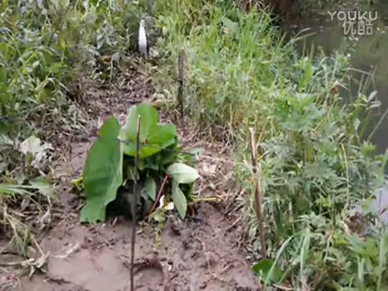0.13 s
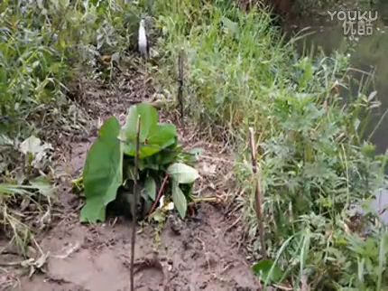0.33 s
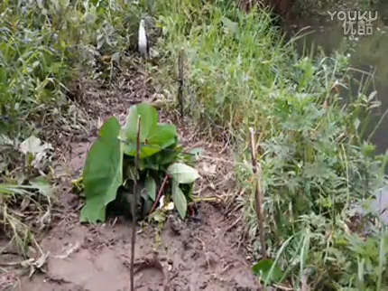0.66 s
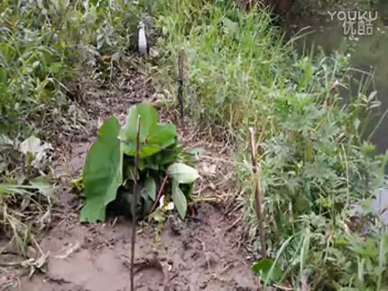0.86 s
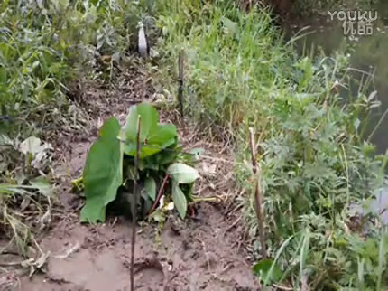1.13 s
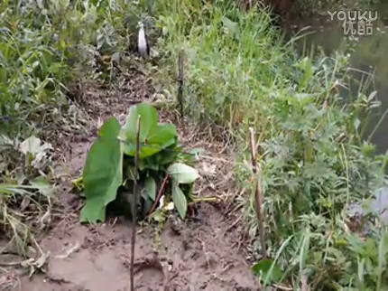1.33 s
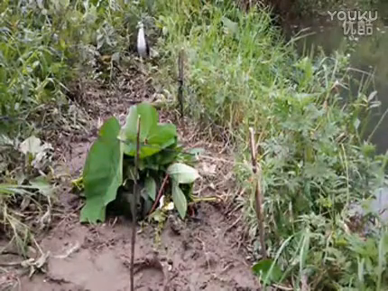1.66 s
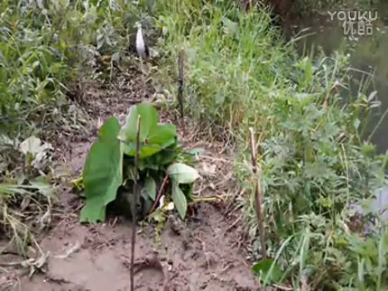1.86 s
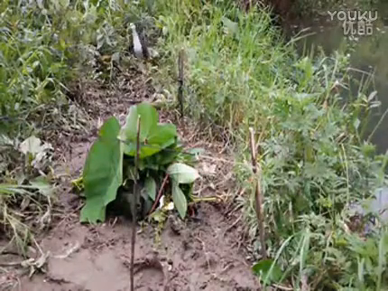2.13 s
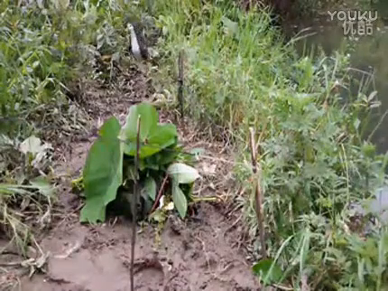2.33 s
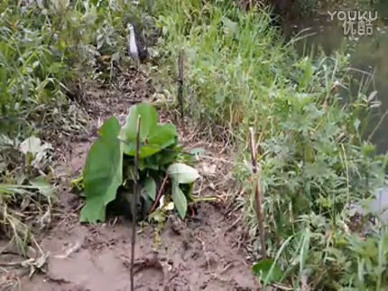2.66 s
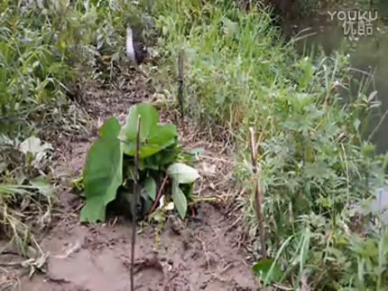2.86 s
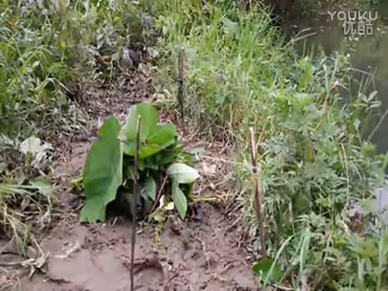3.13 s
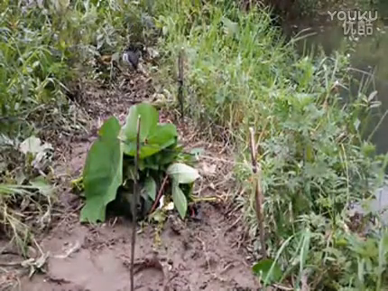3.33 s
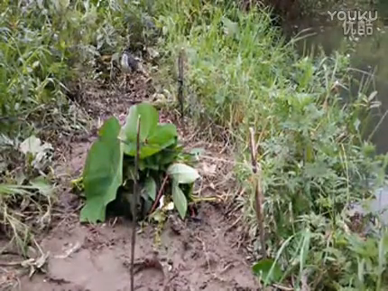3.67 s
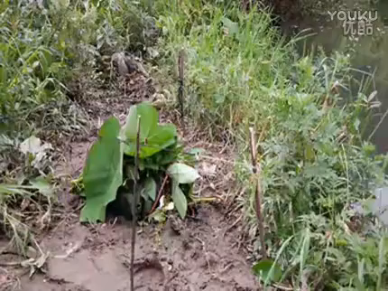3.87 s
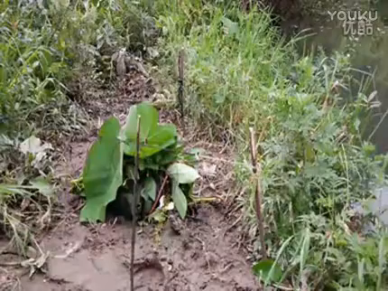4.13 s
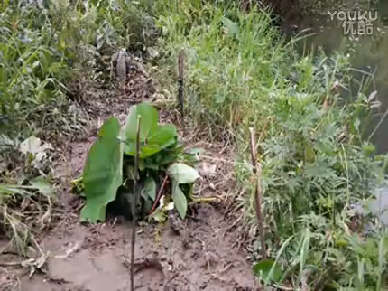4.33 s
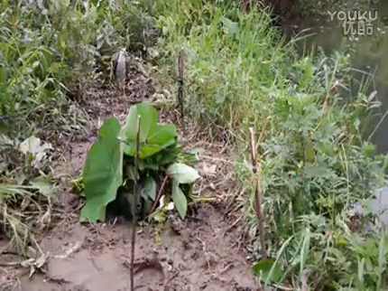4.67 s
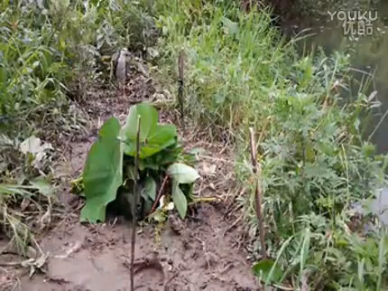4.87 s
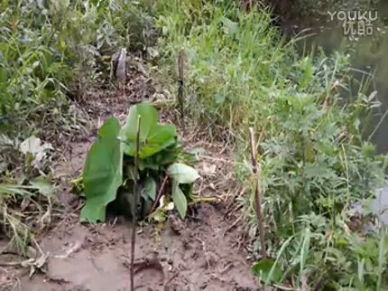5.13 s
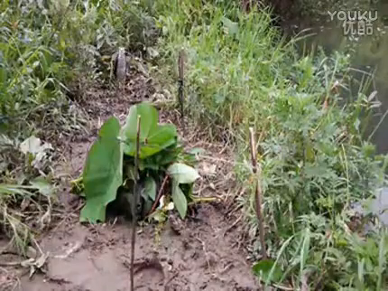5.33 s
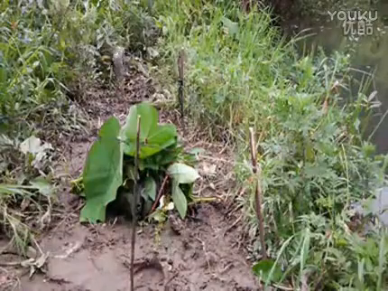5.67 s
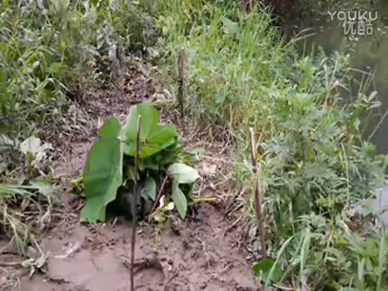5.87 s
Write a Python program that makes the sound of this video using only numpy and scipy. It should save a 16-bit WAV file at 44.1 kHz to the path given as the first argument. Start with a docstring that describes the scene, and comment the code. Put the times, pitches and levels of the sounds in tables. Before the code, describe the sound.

A quiet stream bank with soft water hiss and low rumble throughout, picked up in mono with a slightly dulled top. From 0.1 s a marsh bird gives even, clean two-note clucks about every 0.43 s until the end: a short flat note near 850 Hz leaps to a louder arched note near 1100 Hz, each cluck about a tenth of a second. A second bird joins at 0.65 s with a hoarse croon around 850 Hz that breaks into a loud, buzzing rasp an octave lower with a shrill edge, until 1.1 s. Similar calls run 1.3-1.8, 2.0-2.5 and 2.7-3.2 s, the last stuttering first. Shorter broken croaks follow at 3.4-3.9 s, with a small grunt at 4.15 s. Then only clucks remain, with faint distant songbird whistles from 4.5 to 5.5 s. One last croon and strong rasp sounds at 5.3-5.8 s. Only a short, faint scattered echo follows.

```python
"""A marsh bird on a stream bank repeats a clean two-note cluck, made of gliding sine tones.
Another croons a hoarse tone that breaks into a grating rasp an octave lower: pulses ring resonances.
Small songbirds whistle far off in gliding sines, over water hiss and low rumble of shaped noise.
The banks return a short scattered echo of the birds."""
import sys
import numpy as np
from scipy import signal
from scipy.fft import rfft, irfft, next_fast_len
from scipy.io import wavfile
from scipy.ndimage import uniform_filter1d, map_coordinates

SR = 44100
rng = np.random.default_rng(int(sys.argv[2]) if len(sys.argv) > 2 else 0)


def bounce(signal):
    """Save signal as a 16-bit WAV file at the path given by the first command-line argument."""
    frames = np.transpose(np.atleast_2d(signal))
    limited = np.clip(frames, -1, 1)
    pcm = np.round(limited * 32767).astype(np.int16)
    wavfile.write(sys.argv[1], SR, pcm)


N = 264159

# the beak's shrill resonance, one curve a rasp: (time [s], centre [Hz], shrill level [dB])
BEAK_CURVES = [
    [(0.73, 4250, -59.5), (0.81, 4340, -44), (0.88, 4306, -26.5), (0.96, 4285, -21.5), (1.04, 4380, -38.5),
     (1.088, 4210, -30.5), (1.105, 4250, -59.5), (1.14, 4190, -56)],
    [(1.5, 4280, -63), (1.54, 4410, -37.5), (1.62, 4526, -42.5), (1.7, 4360, -32), (1.75, 4350, -30),
     (1.79, 4250, -54)],
    [(2.2, 4320, -56.5), (2.27, 4220, -34), (2.37, 4290, -40), (2.44, 4210, -33.5), (2.465, 4360, -27.5),
     (2.49, 4240, -45.5), (2.51, 4310, -67.5)],
    [(3.0, 4070, -49.5), (3.043, 4140, -22.5), (3.09, 4110, -42), (3.12, 4144, -30), (3.19, 4120, -26.5),
     (3.215, 4300, -69)],
    [(3.84, 4355, -49.5), (3.87, 4500, -53), (3.9, 4220, -37), (3.93, 4190, -63.5)],
    [(4.16, 4270, -53.5), (4.206, 4290, -46), (4.24, 4370, -66)],
    [(5.495, 4370, -53), (5.546, 4200, -21), (5.67, 4173, -18), (5.715, 4140, -31), (5.74, 4310, -44),
     (5.765, 4100, -28.5), (5.8, 4630, -65.5)],
]
SWELL_DB = 41  # depth from which a call swells and to which it dies


def clucks():
    """Frequency and amplitude modulation of a sine: a flat low note jumps to a louder arched one."""
    # calls: (start [s], delay to the top of the high note [s], reference pitch [Hz],
    # low note level [dB], high note level [dB])
    calls = [(0.092, 0.057, 1107, -25, -16.5), (0.499, 0.061, 1112, -26, -16.5),
             (0.924, 0.065, 1100, -26.5, -16.5), (1.37, 0.06, 1104, -30.5, -16.5),
             (1.81, 0.06, 1104, -24, -15.5), (2.246, 0.055, 1121, -21.5, -15.5),
             (2.654, 0.066, 1104, -24, -14.5), (3.079, 0.065, 1103, -29.5, -16),
             (3.511, 0.062, 1103, -27, -16), (3.964, 0.06, 1117, -23, -13.5),
             (4.392, 0.065, 1122, -24.5, -14.5), (4.816, 0.067, 1116, -25, -15),
             (5.251, 0.063, 1112, -25.5, -15.5), (5.69, 0.055, 1130, -27.5, -18)]
    # contour of the low note: (time after the start before stretching [s], pitch [ratio], relative level [dB])
    low_note = [(-.002, .74, -40), (.003, .755, -1.5), (.01, .772, 0), (.03, .775, .5), (.039, .785, 1),
                (.044, .8, -40)]
    # contour of the high note: (time from its top [s], pitch [ratio], relative level [dB])
    high_note = [(-.029, .92, -40), (-.024, .94, -9), (-.017, .96, -4), (-.011, .99, -1), (-.004, 1.003, 0),
                 (.008, .997, -.5), (.015, .975, -2), (.022, .945, -5.5), (.029, .915, -40)]
    track = np.zeros(N)
    for start, delay, hz, low_db, high_db in calls:
        stretch = (delay - .026) / .04  # the low note lasts until the jump
        low_rows = [(start + u * stretch, hz * ratio, low_db + db) for u, ratio, db in low_note]
        high_rows = [(start + delay + u, hz * ratio, high_db + db) for u, ratio, db in high_note]
        add(track, low_rows, flutter_db=.8, drift=.012)
        add(track, high_rows, flutter_db=.3, drift=.004)
    breathy_halo = 1 + 0.04 * wobble(700)  # fast gain changes spread each note in frequency
    return track * breathy_halo


def hoarse_bird():
    """Source-filter principle: membrane pulses and breath noise ring four groups of windpipe resonances."""
    # pulse rate, half the crooned pitch, before jitter and catches; one curve a call: (time [s], rate [Hz])
    pulse_rates = [
        [(0.65, 400.2), (0.72, 410.1), (0.77, 437.5), (0.9, 445.2), (0.98, 474), (1.022, 449), (1.1, 429.3)],
        [(1.3, 350.4), (1.39, 419.8), (1.5, 440.6), (1.55, 420), (1.576, 443), (1.7, 428.7), (1.784, 387.3)],
        [(1.97, 370.7), (1.99, 400), (2.1, 433), (2.146, 414.4), (2.236, 446), (2.3, 435), (2.44, 414.5),
         (2.46, 401.7), (2.49, 334.8)],
        [(2.72, 414.5), (2.894, 415.5), (2.94, 396), (3.03, 440.4), (3.058, 442.8), (3.154, 388.6),
         (3.19, 377.7), (3.23, 349.2)],
        [(3.39, 397.9), (3.44, 417.3), (3.465, 410), (3.485, 435), (3.56, 428.4), (3.59, 404.6)],
        [(3.646, 452), (3.68, 431)],
        [(3.705, 445.8), (3.74, 424)],
        [(3.8, 468), (3.84, 457.6), (3.87, 468)],
        [(4.1, 449.8), (4.14, 422.5), (4.163, 486)],
        [(5.33, 401.6), (5.358, 429.5), (5.448, 428.7), (5.516, 468), (5.56, 444.1), (5.62, 457.8),
         (5.68, 455.2), (5.794, 414)],
    ]
    # brief catches in the voice: (time [s], depth before overlap [dB], width before scaling [s])
    catches = [(2.793, 7, 0.01), (2.829, 18, 0.0057), (2.868, 8, 0.0072), (2.903, 3.5, 0.01),
               (2.933, 29, 0.002), (2.984, 4, 0.0056), (3.462, 9.5, 0.0054), (3.5, 14, 0.0074),
               (3.539, 21, 0.0026), (3.657, 13, 0.0025), (3.821, 3, 0.005)]
    # resonances, a group each: (centre [Hz], width of a single pass [Hz], level within the group [dB])
    croon_modes = [(786, 760, 0)]
    rasp_modes = [(493, 290, -18.5), (1292, 492, 6), (1784, 40, -16.5)]
    nasal_modes = [(2076, 250, 7), (2685, 546, 11.5), (3000, 1300, -18)]
    shrill_modes = [(4150, 620, -6), (5156, 180, -17.5), (6990, 230, -35), (8160, 410, -22.5),
                    (9200, 140, -40.5), (11140, 1900, -42)]
    # air noise in each group: (share from roughness [ratio], share from the rasp [ratio])
    breath_shares = [(1.199, 1.4), (1.8, 0.52), (4, 6.9), (5, 3)]
    # low grunts that close two short calls:
    # (start [s], length [s], start pitch [Hz], end pitch [Hz], level before the gains of the partials [dB])
    grunts = [(3.861, .07, 550, 566, -33), (4.157, .11, 548.4, 557, -38)]
    # partials of a grunt: (multiple of its pitch [ratio], gain [dB])
    grunt_partials = [(1, 2), (2, 4.5), (3, -5), (4, -8), (5, -10.5)]
    # stray tones beside the hoarse calls:
    # (start [s], length [s], start pitch [Hz], middle pitch [Hz], end pitch [Hz], level at the middle [dB])
    side_tones = [(0.917, 0.064, 1620, 1634, 1673, -34), (1.297, .03, 554, 561, 540, -50),
                  (1.729, 0.048, 1414, 1400, 1435, -29), (1.729, .065, 623, 579, 534, -46.5)]

    t = np.arange(N) / SR
    hz, = curves(np.concatenate(pulse_rates), t)
    gains, rough = windpipe(t)
    for time, depth_db, width in catches:
        reach = np.array([[.6], [.6], [1.1], [1.1]])  # nasal and shrill drop out for longer
        gains *= amp(-depth_db * np.exp(-((t - time) / (reach * width)) ** 2))
        lag = (t - time) / 0.011
        hz = hz * (1 + 0.07 * lag * np.exp(-lag ** 2))  # the pitch sags into a catch and rebounds

    split = gains[1] / (gains[0] + gains[1] + 1e-9)  # the rasp brings in the lines halfway
    jitter = 0.00504 * wobble(45) + 0.12 * rough ** 1.3 * wobble(260)
    turn = 2 * np.pi * np.cumsum(hz * (1 + jitter)) / SR
    # without rasp, the odd harmonics of the crooned pitch dominate and the even ones stay weak
    share = [np.clip(split + 0.18, 0, 1), split, 1, split]
    pulses = sum(share[k % 4] * np.cos(k * turn + .3 * k * k) for k in range(1, 28))
    gated = 1 + 1.72 * np.cos(turn)  # air noise swells once a cycle

    out = 0
    groups = (croon_modes, rasp_modes, nasal_modes, shrill_modes)
    for gain, modes, (hoarse, grating) in zip(gains, groups, breath_shares):
        shimmer = amp(2.5 * rough * wobble(140))
        breath_gain = hoarse * rough + grating * split * np.sqrt(2 * rough)
        breath = breath_gain * gated * rng.standard_normal(N)
        source = shimmer * (pulses + breath)
        rung = filtered(source, pipe(modes))
        if modes is shrill_modes:
            rung = rung + beak(source, t)
        local_power = abs(uniform_filter1d(rung ** 2, size=SR // 16))
        out = out + gain * rung / np.sqrt(local_power + 1e-9)
    out = filtered(out, dark)

    for start, length, start_hz, end_hz, db in grunts:
        rows = [(start, start_hz, db - SWELL_DB),
                (start + .011, start_hz, db),  # attack [s]
                (start + length, end_hz, db - 25.5)]  # fade [dB]
        add(out, rows, grunt_partials, flutter_db=3.2, drift=.04)
    for row in side_tones:
        add(out, arc(*row), flutter_db=-2.0, drift=.015)
    return out


def windpipe(t):
    """Amplitude envelopes of the croon, rasp, nasal and shrill resonances, and gain-weighted roughness."""
    # croons: (start [s], swell [s], hold [s], release [s], croon level before surges [dB],
    # nasal level at the start [dB], nasal level at the end [dB], roughness [0-1])
    croons = [(0.64, 0.11, 0.064, 0.13, -26.5, -57, -46, .7), (1.29, .1, 0.12, .08, -25.5, -54, -49.5, .7),
              (1.965, 0.072, 0.2114, .03, -24.5, -58.5, -34.5, .2),
              (2.689, 0.058, 0.282, 0.035, -25, -59.5, -46.5, 0.21),
              (3.392, 0.026, .173, .025, -26, -53, -54, .25),
              (3.644, .01, 0.02045, .02, -25.5, -36.5, -35.5, 0.31),
              (3.701, 0.013, 0.01263, 0.02126, -22.5, -30.5, -30, 0.42),
              (3.797, .01, 0.053, 0.01, -26, -34.5, -30, .27),
              (4.1, .015, 0.035, 0.033, -24.5, -29.5, -32, .28),
              (5.29, 0.057, 0.1812, .04, -25, -42.5, -35, 0.19)]
    # momentary surges: (time [s], croon lift [dB], added nasal level [dB], width [s])
    surges = [(2.099, -1, -37, 0.0046), (2.213, 0, -32, 0.015), (2.767, -0.5, -42.5, 0.0076),
              (2.808, 2, -44, 0.0069), (2.848, 1.5, -40, 0.006), (2.885, 2, -45, 0.0071),
              (2.92, 4, -48.5, 0.0066), (2.964, 4.5, -37, .015), (3.008, 0, -33, 0.019),
              (3.482, 0.5, -38.5, 0.0099), (3.519, 7.5, -32, 0.0072), (3.572, 4.5, -33.5, 0.0052),
              (5.365, 0.5, -41.5, 0.01), (5.46, 1, -32, 0.013), (5.514, -1.5, -31, 0.0095),
              (3.845, 0, -33, 0.0061)]
    # rasps: (start [s], swell [s], hold [s], release [s], rasp level at the start [dB], at the end [dB],
    # croon against rasp before fading [dB], nasal against rasp before fading [dB],
    # first roughness [0-1], time after the start when it begins to settle [s], roughness after [0-1])
    rasps = [(0.649, 0.0064, 0.01, 0.026, -39, -42.5, 0.5, -33, 0.74, .01, 0.6),
             (0.74, 0.1411, 0.2, 0.011, -27, -24.5, -3.5, -11, 0.61, .22, 0.17),
             (1.108, .014, 0.0048, .018, -26, -34.5, -12.5, -30, 0.411, .01, 0.6),
             (1.49, .06, .21, 0.046, -25, -25.5, -4.5, -12.5, 0.68, .05, 0.24),
             (2.211, .045, .236, .01, -26, -26, -5.5, -16, 0.44, .06, 0.16),
             (3.014, .035, .15, 0.037, -27, -29.5, 0.5, -11, 0.51, .045, .35),
             (3.86, 0.0099, .035, .05, -36.5, -42.5, 7, 1, 0.6136, .04, 0.69),
             (4.158, .01, .042, 0.082, -39.5, -40, 8.5, 5, 0.46, .01, .7),
             (5.495, 0.06, 0.22, 0.027, -27, -26, -7, -13, 0.59, .14, .1)]
    croon_rasp_db, rasp_db_per_rough = -36, 27.5  # rasp against croon, and its growth with roughness
    shrill_db, shrill_growth, nasal_loud_db = -42, 1.2, -28.5  # shrill level at a loud nasal ring; exponent
    croon_fade_db, nasal_fade_db = -7, -9.5  # change towards the end of a rasp
    settle_s = .05  # time the roughness takes to settle

    gains, rough, weight = np.zeros((4, N)), np.zeros(N), 1e-9
    for start, swell, hold, release, db, nasal_db, nasal_end_db, uneven in croons:
        gain, u = held(t, start, swell, hold, release)
        gains[:2] += gain * amp([[db], [db + croon_rasp_db + rasp_db_per_rough * uneven]])
        gains[2] += gain * amp(nasal_db + (nasal_end_db - nasal_db) * u)
        rough, weight = rough + gain * uneven, weight + gain
    for time, lift_db, nasal_db, width in surges:
        bump = np.exp(-((t - time) / width) ** 2)
        gains[0] *= amp(lift_db * bump)
        gains[2] += amp(nasal_db) * bump
    gains[3] = amp(shrill_db) * (gains[2] / amp(nasal_loud_db)) ** shrill_growth

    for start, swell, hold, release, db, end_db, croon_db, nasal_db, uneven, settle, settled in rasps:
        gain, u = held(t, start, swell, hold, release)
        rasp = db + (end_db - db) * u
        croon = rasp + croon_db + croon_fade_db * u
        nasal = rasp + nasal_db + nasal_fade_db * u
        gains[:3] += gain * amp([croon, rasp, nasal])
        rough += gain * np.interp(t - start, [settle, settle + settle_s], [uneven, settled])
        weight = weight + gain
    for rows in BEAK_CURVES:
        gains[3] += amp(curves(rows, t)[1]) * (t > rows[0][0]) * (t < rows[-1][0])
    return gains, np.clip(rough / weight, 0, 1)


def held(t, start, swell, hold, release):
    """Swell-hold-release envelope: gain, and progress 0-1 through the hold."""
    held_s = t - start - swell
    rise = np.clip(-held_s / swell, 0, 1)
    fall = np.clip((held_s - hold) / release, 0, 1)
    gain = amp(-SWELL_DB * (rise ** 2 + fall)) * (rise < 1) * (fall < 1)
    return gain, np.clip(held_s / hold, 0, 1)


def pipe(modes):
    """Cascaded resonance: each is applied three times, so that the valleys between them stay dark."""
    return lambda f: sum(amp(db) * (1j * f * w / (c * c - f * f + 1j * f * w)) ** 3 for c, w, db in modes)


def beak(source, t):
    """Heterodyne filter that follows the beak: shift its centre to zero, smooth, shift back."""
    width_hz = 167
    centre_hz = curves(np.concatenate(BEAK_CURVES), t)[0]
    centre = np.exp(2j * np.pi * np.cumsum(centre_hz) / SR)
    lowpass = signal.butter(2, width_hz / 2, fs=SR, output="sos")
    return 2 * np.real(signal.sosfilt(lowpass, source / centre) * centre)


def dark(f):
    """Side-branch absorption: the side cavities cut Gaussian dips in the spectrum."""
    # side cavities that swallow sound: (centre [Hz], width [Hz], gain at the centre before overlap [dB])
    cavities = [(1910, 230, -8.5), (3810, 237, -13), (6000, 340, -5)]
    return amp(sum(db * np.exp(-((f - c) / w) ** 2) for c, w, db in cavities))


def songbirds():
    """Frequency-modulated sines: thin far whistles that bend in pitch."""
    # whistles: (start [s], length [s], start pitch [Hz], middle pitch [Hz], end pitch [Hz],
    # level at the middle [dB])
    whistles = [(2.556, .045, 3600, 3457, 3070, -63), (2.66, 0.087, 2500, 3450, 3130, -60),
                (3.218, 0.16, 2885, 2751, 2874, -63), (4.516, .035, 2566, 2770, 2700, -62),
                (4.671, .03, 2186, 2548, 2799, -58), (4.709, .035, 3210, 3450, 3700, -66),
                (4.764, 0.024, 3960, 4100, 4470, -66), (4.875, .05, 2950, 3900, 5200, -55.5),
                (4.935, .03, 5450, 5130, 4900, -62), (4.987, 0.027, 2530, 2830, 2680, -61),
                (5.047, .045, 4080, 3000, 2450, -55.5), (5.11, .09, 2536, 3600, 4000, -55.5),
                (5.198, 0.074, 4000, 4310, 3560, -53), (5.115, 0.088, 2370, 3148, 3979, -57),
                (5.356, 0.056, 6200, 4950, 4320, -55), (5.399, 0.14, 4420, 3490, 3240, -50.5),
                (5.81, .03, 2680, 3010, 2490, -56), (5.862, 0.033, 2720, 2900, 2650, -62)]
    track = np.zeros(N)
    for row in whistles:
        add(track, arc(*row), flutter_db=3.0, drift=0.0014)
    return track


def banks(x):
    """Diffuse reflection: a short scattered answer from the banks, 20 ms late, dying faster in the treble."""
    # decay of the echo: (frequency [Hz], time to fall 60 dB [s])
    decay_times = [(300, 0.21), (1500, 0.1), (5000, 0.021)]
    hz, t, z = signal.stft(rng.standard_normal(SR // 4), SR, nperseg=256)
    decay = amp(-60 * t / along(decay_times, hz)[:, None])
    tail = signal.istft(z * decay, SR, nperseg=256)[1]
    delayed = np.pad(x, (900, 0))
    return signal.fftconvolve(delayed, tail / np.linalg.norm(tail))[:N]


def stream():
    """Spectrally shaped noise: water hiss and rumble with time-frequency patches of random gain."""
    # spectrum of the water: (frequency [Hz], relative density [dB per Hz])
    spectrum = [(12, -59), (20, -32), (59, -0.5), (128, -4.5), (273, -10.5), (325, -12), (359, -14),
                (609, -12.5), (1790, -18.5), (3450, -19.5), (4110, -20), (4550, -22), (6460, -20.5),
                (8100, -29), (10500, -58.5), (17800, -120)]
    # loudness of the water: (time [s], level before the lift below [dB])
    levels = [(0.0, -61), (2.3, -60.5), (4.3, -59), (5.99, -62.5)]
    lift_db = 7.5
    z = signal.stft(rng.standard_normal(N), nperseg=512)[2]
    field = uniform_filter1d(rng.standard_normal(z.shape), size=6, axis=0)  # smooth over frequency
    field = uniform_filter1d(field, size=8, axis=1)  # smooth over time
    noise = signal.istft(z * amp(1.1 * unit(field)), nperseg=512)[1][:N]
    db, = curves(levels, np.arange(N) / SR)
    water = filtered(noise, lambda hz: amp(along(spectrum, hz)))
    return amp(db + lift_db) * unit(water)


def add(track, rows, tones=((1, 0),), flutter_db=0, drift=0):
    """Additive synthesis: adds a gliding tone of rows (time [s], pitch [Hz], level [dB]) and its partials."""
    first = max(round(rows[0][0] * SR), 0)
    t = np.arange(first, min(round(rows[-1][0] * SR), N)) / SR
    linear_rows = [(s, f, amp(db)) for s, f, db in rows]
    hz, size = (uniform_filter1d(c, size=132) for c in curves(linear_rows, t))  # round the corners over 3 ms
    drifting_hz = hz * (1 + drift * wobble(250, size=len(t)))
    turn = 2 * np.pi * np.cumsum(drifting_hz) / SR + rng.uniform(0, 2 * np.pi)
    tone = sum(amp(level) * np.sin(k * turn) for k, level in tones)
    flutter = amp(flutter_db * wobble(180, size=len(t)))
    window = np.hanning(len(t)) ** .1  # soft ends
    track[first:first + len(t)] += np.sqrt(2) * size * window * flutter * tone  # root 2: rms to peak


def arc(s, length, start_hz, middle_hz, end_hz, db):
    """Quadratic glide: rows (time [s], pitch [Hz], level [dB]) through three pitches, softer at both ends."""
    edge_db = -5
    u = np.linspace(-1, 1, num=17)
    slope = (end_hz - start_hz) / 2
    bend = (start_hz + end_hz) / 2 - middle_hz
    hz = middle_hz + slope * u + bend * u ** 2
    return list(zip(s + (u + 1) / 2 * length, hz, db + edge_db * u ** 4))


def wobble(rate, size=N):
    """Band-limited random modulation: a smooth curve through random knots, rate knots a second."""
    knots = rng.standard_normal(int(size * rate / SR) + 4)
    return map_coordinates(knots, [np.arange(size) * rate / SR])


def filtered(x, response):
    """Convolution theorem: multiplies the spectrum of x by a response of frequency."""
    m = next_fast_len(N + SR // 2)
    return irfft(rfft(x, m) * response(np.fft.rfftfreq(m, 1 / SR)), m)[..., :N]


def amp(db):
    """Decibel law: level to amplitude ratio."""
    return 10 ** (np.asarray(db) / 20)


def unit(x):
    """Normalisation to an rms of one."""
    return x / np.sqrt(np.mean(x ** 2) + 1e-20)


def along(points, hz):
    """Interpolation of (frequency [Hz], value) points on a logarithmic frequency axis."""
    f, v = np.transpose(points)
    return np.interp(np.log(hz + 1), np.log(f + 1), v)


def curves(rows, t):
    """Linear interpolation: one value per time in t for each column after the first."""
    s, *cols = np.transpose(rows)
    return [np.interp(t, s, c) for c in cols]


def scene():
    """Superposition: the direct birds, their echo from the banks and the stream add up."""
    near, hoarse, far = clucks(), hoarse_bird(), songbirds()
    echo = banks(amp(-33.5) * near + amp(-19) * hoarse + amp(-8.5) * far)
    return (near + hoarse + echo + far + stream())[None]


def record(dry):
    """Band limiting: the microphone drops off above its edge, faint hiss joins, and the top is cut."""
    edge_hz, top_hz = 7650, 15073
    hiss = amp(-85) * rng.standard_normal(dry.shape)  # electronic hiss
    heard = filtered(dry, lambda hz: np.where(hz < edge_hz, 1, amp(-14.5))) + hiss
    return filtered(heard, lambda hz: hz < top_hz)


dry = scene()
out = record(dry)
bounce(out)
```